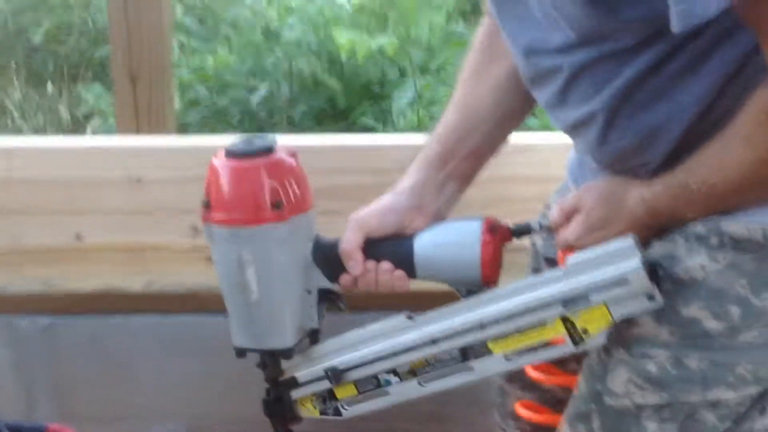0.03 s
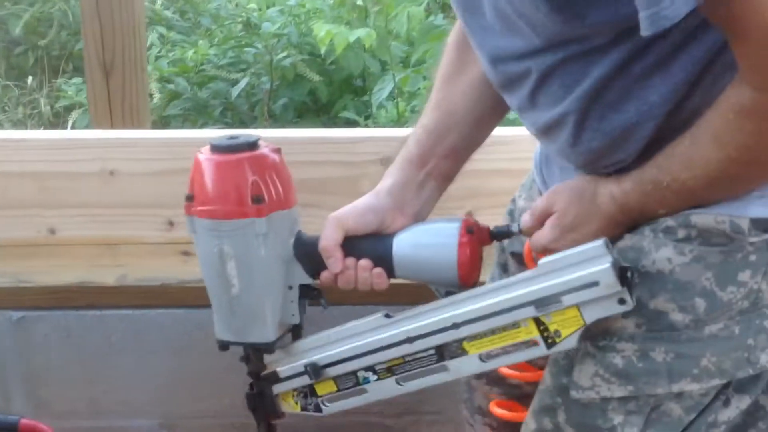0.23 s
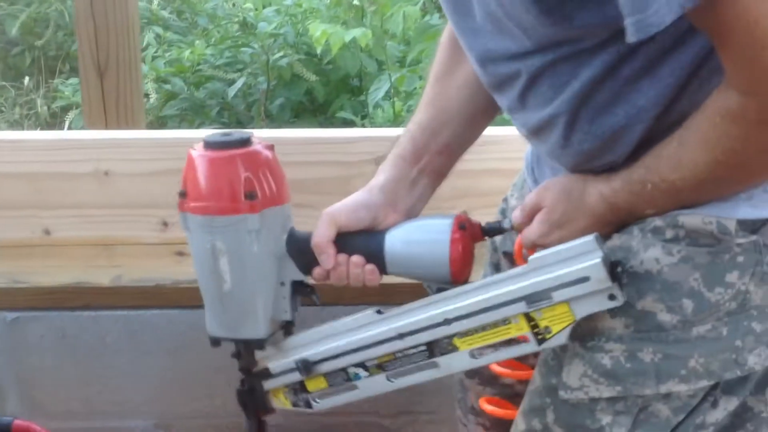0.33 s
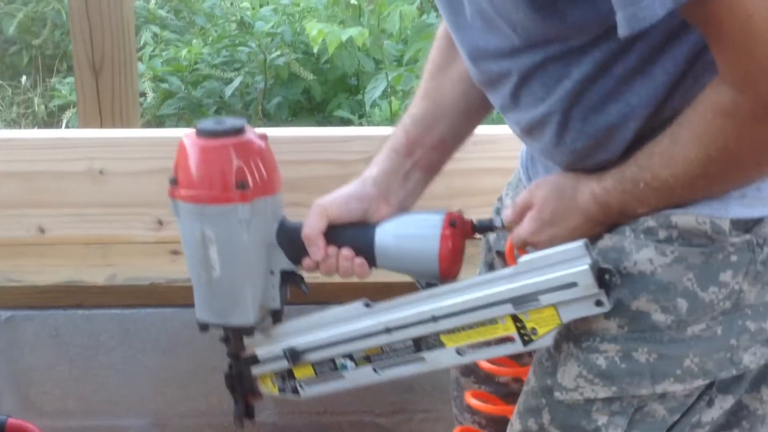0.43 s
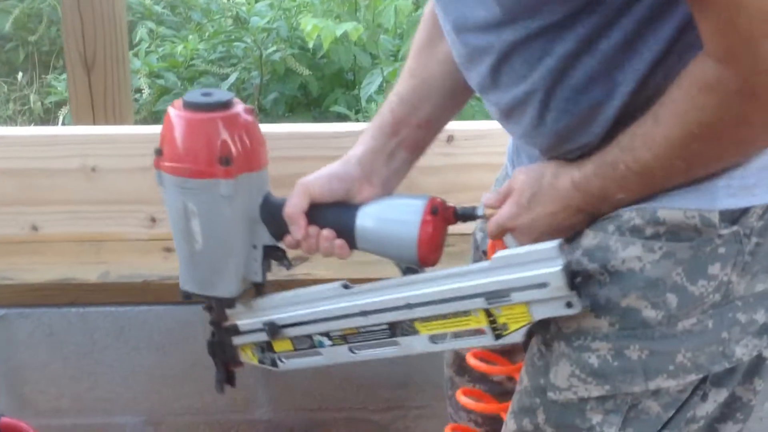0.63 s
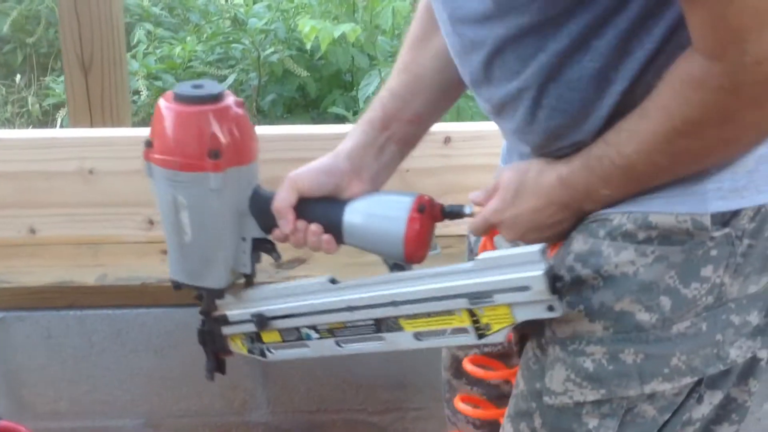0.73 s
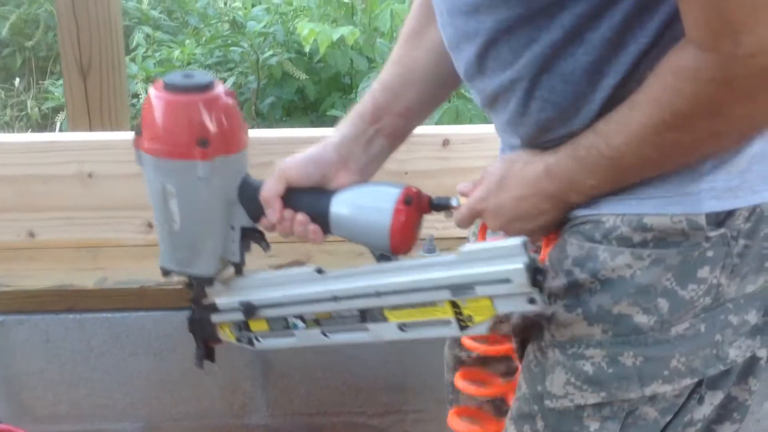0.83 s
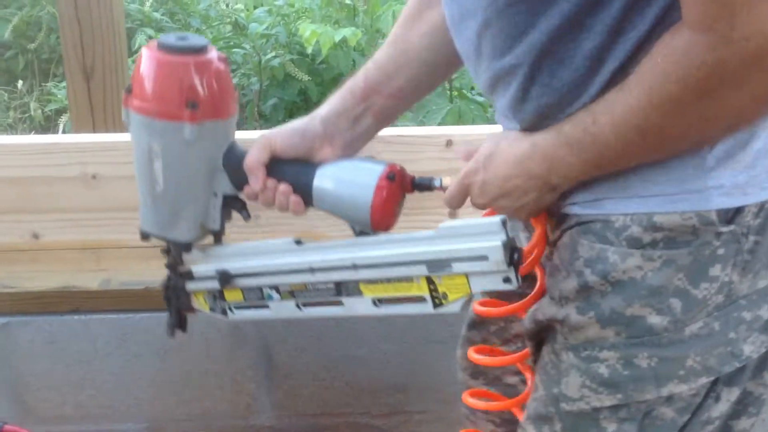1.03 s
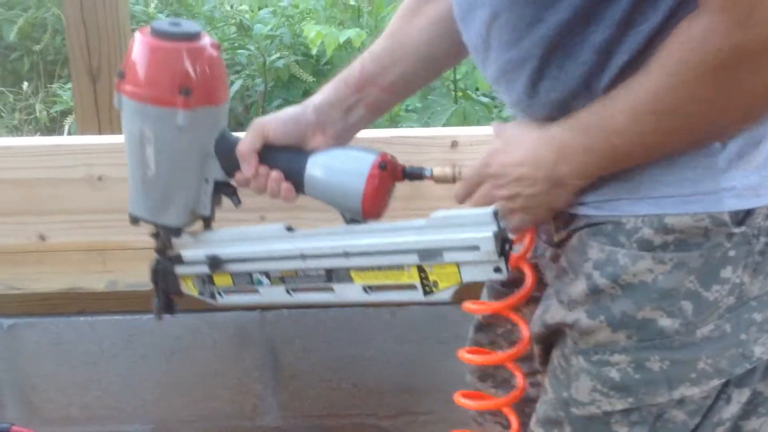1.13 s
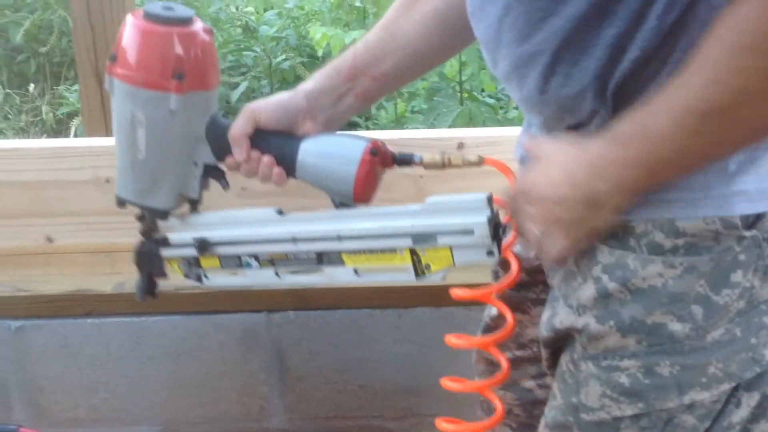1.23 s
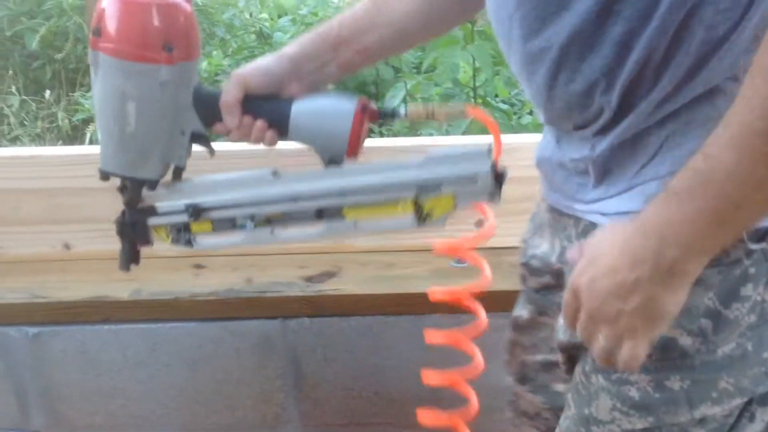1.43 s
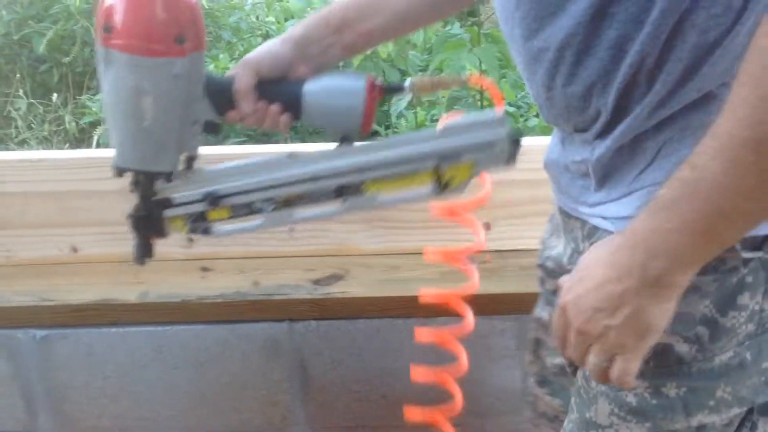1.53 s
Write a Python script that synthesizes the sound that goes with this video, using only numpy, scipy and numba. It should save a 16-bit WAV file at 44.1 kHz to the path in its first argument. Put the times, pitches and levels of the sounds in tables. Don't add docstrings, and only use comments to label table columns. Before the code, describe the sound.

An air hose coupler snaps onto a nail gun with a sharp air burst, then fading hiss

```python
import sys
import numpy as np
from scipy import signal
from scipy.fft import rfft, irfft
from scipy.io import wavfile
from scipy.ndimage import uniform_filter1d
from numba import njit

SR = 44100
rng = np.random.default_rng(int(sys.argv[2]) if len(sys.argv) > 2 else 0)


def dump(signal):
    limited = np.clip(np.atleast_2d(signal).T, -1, 1)
    pcm = np.round(limited * 32767).astype(np.int16)
    wavfile.write(sys.argv[1], SR, pcm)


def makeup_ratio(level_db):
    decades = np.asarray(level_db, float) / 20
    return 10 ** decades


N = 70560


def unit(x):
    return x / np.sqrt(np.mean(x ** 2))


def coloured(spectrum):
    points = np.array(spectrum)
    hz = np.maximum(np.fft.rfftfreq(N, 1 / SR), 1)
    gain_db = np.interp(np.log(hz), np.log(points[:, 0]), points[:, 1])
    return unit(irfft(rfft(rng.standard_normal(N)) * makeup_ratio(gain_db), N))


def walk(rate_hz):
    hold = int(SR / rate_hz)
    steps = np.repeat(rng.standard_normal(N // hold + 1), hold)
    smooth = uniform_filter1d(uniform_filter1d(steps, hold), hold)
    return unit(smooth[:N])


@njit
def resonate(x, hz, width_hz):
    y, band, low = np.empty(len(x)), 0., 0.
    for i in range(len(x)):
        g, k = np.tan(np.pi * hz[i] / SR), width_hz / hz[i]
        v = (band + g * (x[i] - low)) / (1 + g * (g + k))
        band, low, y[i] = 2 * v - band, low + 2 * g * v, k * v
    return y


def resonant_noise(centre_hz, width_hz):
    once = resonate(rng.standard_normal(N), centre_hz, width_hz)
    return unit(resonate(once, centre_hz, width_hz))


def contact_force(scrape_s, centre_hz, t):
    force = rng.standard_normal(len(t)) * np.exp(-t / max(scrape_s, 1e-4))
    force[0] = 4.4
    return signal.lfilter(*signal.butter(1, (centre_hz / 2, centre_hz * 2), "band", fs=SR), force)


def modal_response(modes, split, damping, t):
    hz, mode_db, t60_s = np.array(modes).T[:, :, None]
    vary_db, below, above = rng.standard_normal((3, len(modes), 1))
    signs = (-1.) ** np.arange(len(modes))[:, None]
    cluster = np.sin(2 * np.pi * hz * t)
    for detune in (below, above):
        cluster = cluster + 0.568 * np.sin(2 * np.pi * hz * (1 + split * detune) * t)
    decay = 1000. ** (-t / (t60_s * damping))
    return np.sum(signs * makeup_ratio(mode_db + 1.64 * vary_db) * cluster * decay, axis=0)


def knocks(events, modes, split):
    crack_db, crack_s = 6.5, 0.00045
    out, span = np.zeros(N), 6000
    t = np.arange(span) / SR
    for at, db, scrape_s, centre_hz, damping in events:
        force = contact_force(scrape_s, centre_hz, t)
        ring = signal.fftconvolve(force, modal_response(modes, split, damping, t))[:span]
        ring = ring / np.sqrt(np.mean(ring[:441] ** 2))
        crack = force * np.exp(-t / crack_s)
        crack = crack / np.max(np.abs(crack))
        i = int(at * SR)
        out[i:i + span] += (makeup_ratio(db) * (ring + makeup_ratio(crack_db) * crack))[:N - i]
    return out


# time in seconds, level in dB.
BLAST_LEVEL = [
    (0.2123, -75),
    (0.2123, -34.5),
    (0.2155, -30),
    (0.2158, -20),
    (0.222, -17.5),
    (0.235, -20),
    (.248, -16.5),
    (0.271, -35.5),
    (.3, -48),
    (.34, -71.5),
]
# frequency in Hz, density in dB per Hz.
BLAST_SPECTRUM = [(200, -17), (800, -19.5), (2200, -18.5), (4500, -10.5), (6000, -10.5), (8400, -9.5),
                  (11500, -4.5), (15500, -8.5)]


def blast(t):
    at, db = np.array(BLAST_LEVEL).T
    level_db = np.interp(t, at, db, -120, -120) + 1.3 * walk(500)
    return makeup_ratio(level_db) * coloured(BLAST_SPECTRUM)


# start in seconds, level in dB, scrape length in seconds,
# contact centre in Hz, share of the decay time left by the hand (0-1).
SLEEVE_BLOWS = [
    (.2198, -25, .007, 1480, 0.45),
    (.2439, -15, 0.00036, 1740, 0.65),
    (.2458, -19, 0.0018, 1880, 0.88),
    (.251, -21, 0.00048, 1490, 0.7),
    (.2572, -24, 0.00075, 3000, 0.64),
    (.261, -26.5, 0.0061, 1190, 0.48),
]
# frequency in Hz, level in dB, T60 in seconds.
BODY_MODES = [(286.2, -7, 0.088), (560.8, -8.5, 0.064), (705, -13, 0.053), (985, -14, 0.0565),
              (1154, -15.5, 0.0855), (1365, -9, 0.08), (1541, -1.5, 0.0646), (1728, 3.5, 0.04),
              (1937, -0.5, 0.051), (2287, -7, 0.047), (2850, -9, 0.058), (3280, -10.5, 0.055),
              (3604, -8, 0.059), (4674, -9, 0.04)]


def sleeve_snap():
    return knocks(SLEEVE_BLOWS, BODY_MODES, split=0.0453)


# frequency in Hz, width in Hz, level in dB,
# time of greatest strength in seconds, fade time in seconds.
VALVE_RESONANCES = [(3240, 210, -5, 0.38, 0.17), (3184, 65, -4.5, 0.97, .25), (5010, 50, -13, 0.36, 0.53),
                    (5320, 210, -0.5, 0.45, 1.03), (5650, 710, -2, 0.71, 1.2), (5913, 76, -10, 0.64, 0.64),
                    (7195, 130, -3.5, 1, 0.91), (7850, 1050, -2.5, 1, 1.1), (9820, 155, -4.5, .52, 0.11),
                    (9800, 200, -9.5, 0.75, .4), (10930, 920, -7, 0.98, .8), (12600, 300, -19, .6, .8)]
# frequency in Hz, density in dB per Hz.
FILL_SPECTRUM = [(250, -19), (1500, -12), (4300, -9), (6500, -8), (8200, -7.5), (8800, -18), (9600, -7),
                 (15500, -9.5)]


def filling(t):
    start_s, rise_s, start_db = 0.248, 0.0213, -41.5
    fall_db_per_s, closing_db_per_s2 = 5, 12
    broad_db, flicker_db, drift = -1.5, 1.3, 0.0025
    since = np.maximum(t - start_s, 0)
    flow_db = start_db - fall_db_per_s * since - closing_db_per_s2 * since ** 2 + 0.99 * walk(8.5)
    whistles = 0
    for hz, width_hz, db, best_s, fade_s in VALVE_RESONANCES:
        centre_hz = hz * (1 + drift * walk(12.25))
        fade_db = 4.7 * np.minimum(((t - best_s) / fade_s) ** 2, 3)
        level_db = db - fade_db + flicker_db * walk(14.24)
        whistles = whistles + makeup_ratio(level_db) * resonant_noise(centre_hz, 1.38 * width_hz)
    flow = unit(whistles) + makeup_ratio(broad_db) * coloured(FILL_SPECTRUM)
    return makeup_ratio(flow_db) * np.minimum(since / rise_s, 1) * flow


# start in seconds, level in dB, scrape length in seconds,
# contact centre in Hz, share of the decay time left (0-1).
NAIL_KNOCKS = [(.141, -56.5, 0.014, 1700, 0.4), (.1675, -50.5, 0.0054, 3500, 0.01),
               (.17, -49.5, 0.0194, 2500, 0.08), (.197, -51, 0.0052, 1710, .6),
               (.5026, -43, 0.00088, 4500, .3), (.506, -45.5, 0.0023, 2600, 0.95),
               (.511, -38, 0.0018, 1900, 0.9), (.5152, -39, 0.00088, 1610, 0.9),
               (.566, -53.5, 0.0045, 1500, 0.41), (.583, -51, .004, 1500, 0.4),
               (1.11, -60, 0.051, 2000, .15), (1.555, -57, 0.00086, 1100, 0.03)]
# frequency in Hz, level in dB, T60 in seconds.
MAGAZINE_MODES = [(1370, 1, 0.1), (1696, 3, 0.069), (2051, 3, 0.053), (2390, -20, 0.038),
                  (3000, -2.5, 0.031), (3580, -5.5, 0.051), (4300, -8, .02)]


def nail_rattle():
    return knocks(NAIL_KNOCKS, MAGAZINE_MODES, split=0.0057)


# centre in seconds, length in seconds, level in dB.
BRUSHES = [
    (0.656, 0.044, -62),
    (0.896, .12, -58),
    (1.146, 0.0325, -66),
    (1.468, 0.042, -55.5),
    (1.55, 0.021, -62),
]
# frequency in Hz, density in dB per Hz.
CLOTH_SPECTRUM = [(150, -19), (400, 1.5), (900, -3), (1400, -8), (2500, -25), (6000, -40)]


def rustle(t):
    swell = sum(makeup_ratio(db) * np.exp(-((t - at) / length_s) ** 2) for at, length_s, db in BRUSHES)
    return swell * makeup_ratio(2.1 * walk(120)) * coloured(CLOTH_SPECTRUM)


def scattering(near, t):
    delay_s, t60_s, level_db = .004, .1, -11
    lag = t[:SR // 2]
    scatter = rng.standard_normal(len(lag)) * 1000. ** (-lag / t60_s) * (lag > delay_s)
    scatter = scatter / np.sqrt(np.sum(scatter ** 2))
    return makeup_ratio(level_db) * signal.fftconvolve(near, scatter)[:N]


def insects():
    out = 0
    for hz, width_hz, db in ((7660, 1200., -56.5), (13200, 2500., -64.5)):
        level_db = db + 0.54 * walk(60.1)
        out = out + makeup_ratio(level_db) * resonant_noise(np.full(N, 1. * hz), width_hz)
    return out


# frequency in Hz, level in dB, wobble in dB.
HUM_TONES = [
    (117.3, -76, 6.5),
    (242.3, -54.5, 2),
    (376, -64.5, 4),
]


def hum(t):
    out = 0
    for hz, db, wobble_db in HUM_TONES:
        level = np.sqrt(2) * makeup_ratio(db + wobble_db * walk(24.97))
        out = out + level * np.sin(2 * np.pi * hz * t + 0.94 * walk(14.83))
    return out


# frequency in Hz, density in dB per Hz.
OUTDOOR_SPECTRUM = [(40, -1.5), (100, -19.5), (180, -4), (330, -6.5), (700, -13), (1300, -17), (3500, -28),
                    (15500, -25.5)]


def outdoors():
    return makeup_ratio(-51 + .6 * walk(5.5)) * coloured(OUTDOOR_SPECTRUM)


def scene():
    t = np.arange(N) / SR
    near = blast(t) + sleeve_snap() + nail_rattle()
    far = outdoors() + insects() + hum(t)
    return (near + scattering(near, t) + filling(t) + rustle(t) + far)[None]


def low_pass(x):
    return signal.sosfilt(signal.butter(12, 16300, fs=SR, output="sos"), x)


def record(dry):
    low_hz, top_hz = 127, 15230
    rounded = .75 * np.tanh(dry / .75)
    thin = signal.sosfilt(signal.butter(3, low_hz, "high", fs=SR, output="sos"), rounded)
    mix = signal.sosfilt(signal.ellip(10, .2, 70, top_hz, fs=SR, output="sos"), thin)
    return low_pass(mix)


dry = scene()
out = record(dry)
dump(out)
```